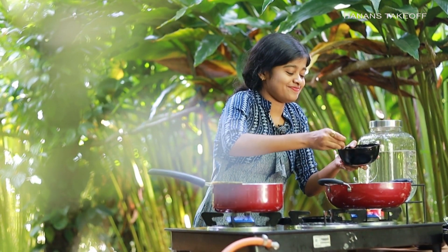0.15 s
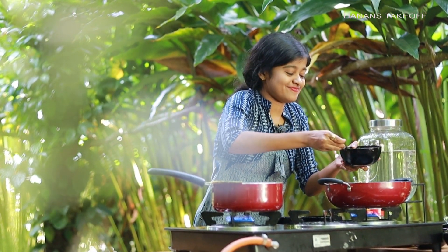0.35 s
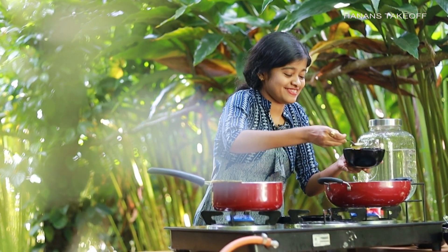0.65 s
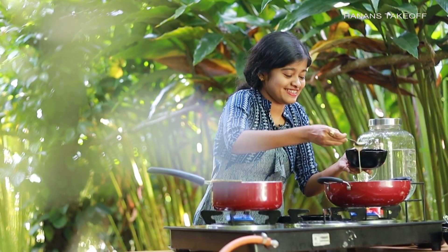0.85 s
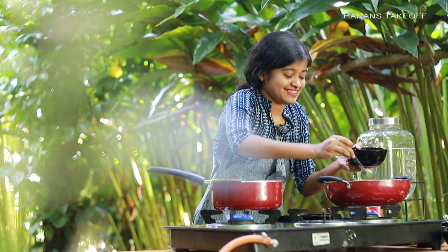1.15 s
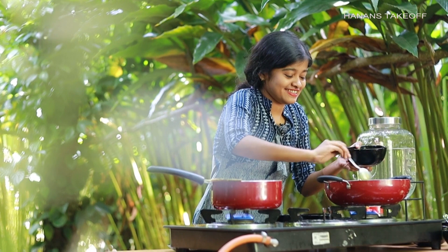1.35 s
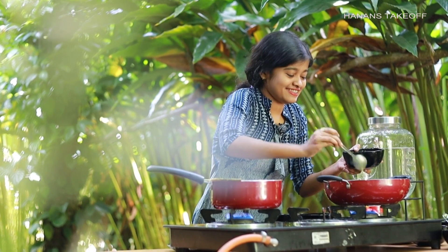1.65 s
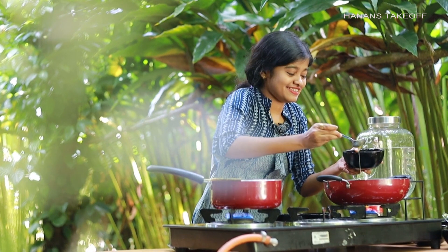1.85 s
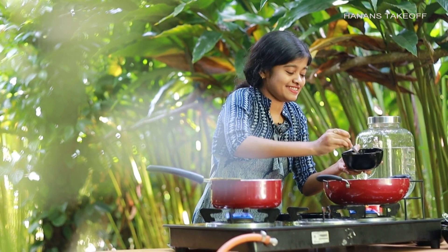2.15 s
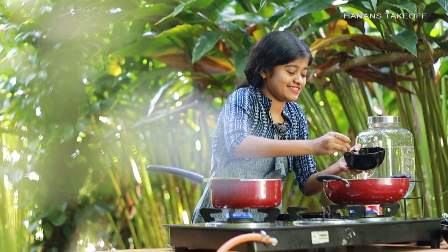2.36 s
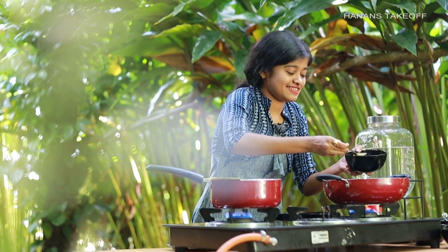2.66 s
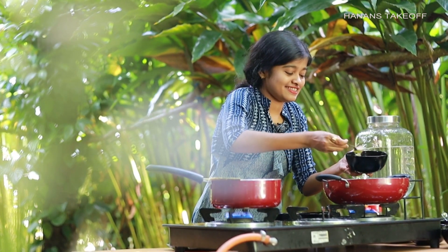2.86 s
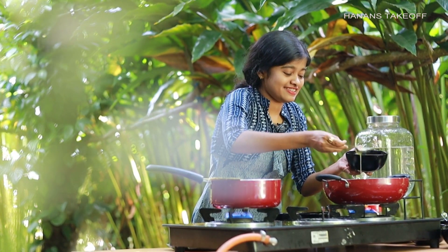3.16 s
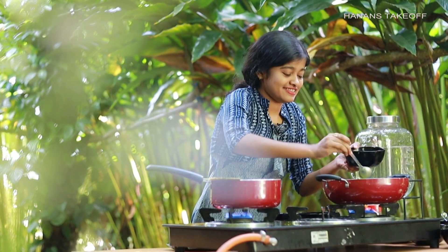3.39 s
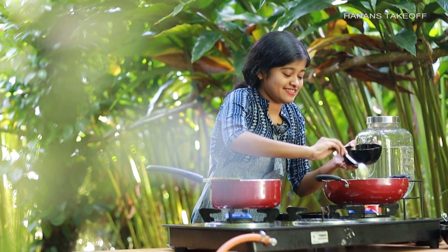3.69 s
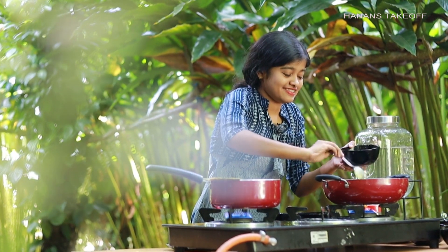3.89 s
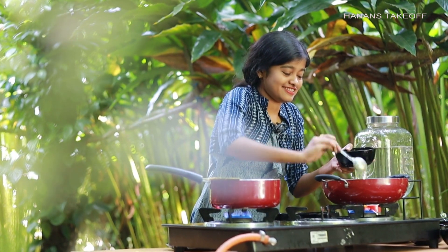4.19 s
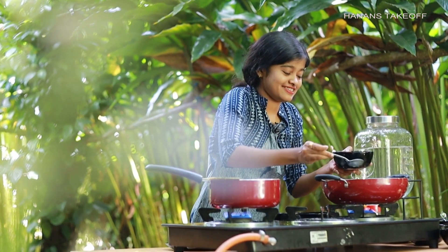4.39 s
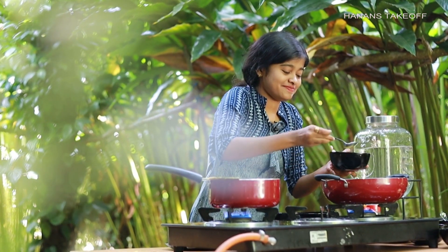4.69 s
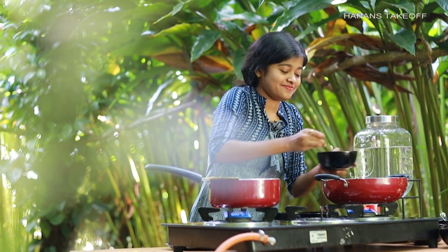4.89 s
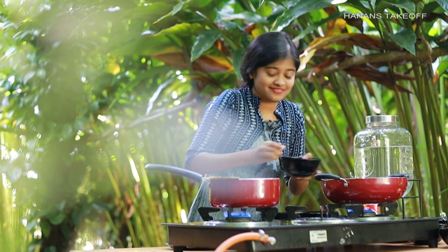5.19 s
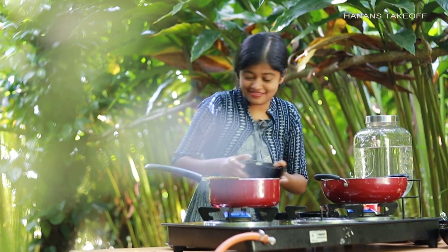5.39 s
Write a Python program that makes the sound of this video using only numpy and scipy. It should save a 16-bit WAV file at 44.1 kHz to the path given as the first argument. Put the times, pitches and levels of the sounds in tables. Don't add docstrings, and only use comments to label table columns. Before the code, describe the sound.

A spoon taps and scrapes a ceramic bowl up close while a distant cuckoo-like bird whistles rising phrases over trilling crickets outdoors.

```python
import sys
import numpy as np
from scipy import signal
from scipy.fft import rfft, irfft, next_fast_len
from scipy.io import wavfile
from scipy.ndimage import uniform_filter1d

SR = 44100
rng = np.random.default_rng(int(sys.argv[2]) if len(sys.argv) > 2 else 0)


def how_loud(loudness_db):
    steps = np.asarray(loudness_db, float) / 20
    return 10 ** steps


def master_out(mix):
    frames = np.transpose(np.atleast_2d(mix))
    ceiling = np.clip(frames, -1, 1)
    pcm = np.round(ceiling * 32767).astype(np.int16)
    wavfile.write(sys.argv[1], SR, pcm)


N = 244269

# (start t/s, note, length/s, held f/Hz, level/dB)
BIRD_NOTES = [
    (0.586, "opening", .226, 1792, -40.5),
    (0.91, "crest", 0.24, 1846, -39.5),
    (1.145, "fall", 0.12, 1851, -39.5),
    (2.626, "opening", 0.24, 1847, -38.5),
    (2.959, "crest", 0.23, 1887, -37.5),
    (3.189, "fall", .122, 1864, -38.5),
    (4.545, "opening", .232, 1893, -34.5),
    (4.875, "crest", .24, 1926, -34),
    (5.115, "fall", 0.11, 1900, -37),
]
NOTE_GLIDES = { "opening": [(0, .78, -30), (.1, .96, -12), (.17, 1, -7), (.42, .99, -7), (.63, 1, 1),
               (.73, .94, -3), (.835, .825, -12), (1, .92, -24)], "crest": [(0, .91, -30), (.085, .98, -13),
               (.2, 1.105, 1.5), (.3, 1.09, -1.5), (.35, 1.005, -1.5), (.635, .995, -2), (.76, .85, -8),
               (.89, .73, -6), (1, .77, -24)], "fall": [(0, 1, -8), (.12, .97, 0), (.38, .885, -2),
               (.64, .815, -2), (1, .87, -20)]}
# (t/s, spot, level/dB, hardness 0-1, freedom to ring 0-1)
SPOON_TAPS = [
    (.2115, "rim", -29, 0.93, 0.66),
    (.2639, "rim", -37.5, 0.76, 0.5),
    (2.3295, "base", -25, 0.8, 0.36),
    (5.1545, "lip", -27, 0.91, 0.62),
    (5.2008, "wall", -19, 0.8, 0.18),
    (5.2125, "wall", -26, 0.76, 0.17),
    (5.217, "wall", -36, 0.5, 0.15),
    (5.2205, "wall", -27.5, 0.85, 0.29),
]
# (t/s, spot, level/dB)
SPOON_SETTLES = [(.348, "wall", -48), (5.2836, "wall", -36.5), (5.289, "skid", -43), (5.303, "lip", -42.5),
                 (5.317, "wall", -42), (5.345, "lip", -49), (5.3726, "wall", -50), (5.394, "rim", -46.5),
                 (5.429, "wall", -47), (5.493, "skid", -48), (5.514, "wall", -46)]
STRIKE_SPOTS = ["rim", "base", "lip", "wall"]
# (f/Hz, t60/s, level/dB struck on rim, on base, on lip, on wall)
BOWL_MODES = [(598, 0.058, -9, -7, -27, -18), (1176, 0.039, -2.5, -3.5, -2, -18),
              (2123, 0.079, -3.5, -4, -7, -16), (2630, 0.04, 6.5, 2.5, 2, 7.5),
              (3110.4, 0.039, -23, -20, -3, 0), (3424, 0.056, -14, -4.5, -4, -2),
              (4150, 0.053, -3, 2, -10, 1), (4390, 0.053, -12, -16, 9, 2.5),
              (4610, .047, -2.5, 10, -9, -11), (6700, 0.044, 2.5, -2, -2, -4),
              (9630, 0.056, -15, -11, -7, -8), (10600, .05, -12, -7.5, 3, -2.5),
              (13400, .056, -25, -25, -7, -7), (15400, .05, -32, -28, -31, -14)]
# (f/Hz, t60/s, level/dB struck on rim, on base, on lip, on wall)
SPOON_MODES = [(885, 0.23, -3.5, -17.5, -6.5, -9.5), (2250, 0.26, -8.5, -13.5, -19, 0),
               (4032, 0.25, -10, -7, -17, 3.5), (6125, 0.23, -16, -25, -30, -2.5),
               (8600, 0.12, -5.5, -0.5, -25, -3.5), (11340, 0.091, -13.5, -2.5, -16, -5),
               (14520, .08, -24, -16, -20, -3)]
# (start t/s, end t/s, level/dB)
CRICKET_BOUTS = [
    (-.05, 0.866, -63.5),
    (0.951, 1.829, -61),
    (1.973, 2.784, -61),
    (2.977, 3.741, -60),
    (3.98, 4.838, -61),
    (4.956, 5.809, -58),
]
# (share of the bout 0-1, wing resonance f/Hz, level/dB)
BOUT_COURSE = [
    (0, 6030, -6),
    (.07, 6090, -2),
    (.16, 6270, 0),
    (.42, 6240, 0),
    (.55, 6370, 0),
    (.8, 6420, 0),
    (.97, 6420, -2),
    (1, 6420, -8),
]
# (t/s, level/dB, centre f/Hz, width/Hz, t60/s)
PAN_DRIPS = [(0.56, -55, 1300, 1400, .02), (.995, -52.5, 880, 25, 0.041), (.70, -62, 2600, 97, 0.075),
             (2.69, -65, 5600, 500, 0.066), (1.769, -40, 1700, 900, 0.014),
             (2.074, -43.5, 1280, 450, 0.019), (4.1, -56, 1170, 1300, 0.018), (3.3, -57, 3300, 2400, 0.016),
             (4.414, -61.5, 3100, 2100, 0.011), (5.050, -50, 10400, 6800, 0.021),
             (1.8, -65, 6300, 440, 0.033), (1.8, -61, 5600, 370, .03), (3.2, -44.5, 990, 820, 0.017)]
# (start t/s, caller, length/s, level/dB)
FAR_CALLS = [(1.38, "finch", .3, -71), (1.7, "finch", .25, -70), (3.65, "finch", .42, -69),
             (1.58, "piper", .12, -70), (1.78, "piper", .12, -71), (.5, "peeper", .1, -65),
             (.68, "peeper", .07, -62), (2.84, "peeper", .07, -63), (1.93, "dove", .28, -66),
             (4.07, "wren", .14, -75), (.01, "thump", .045, -52), (.53, "gust", .08, -59),
             (.77, "gust", .08, -59), (4.9, "gust", .1, -59), (5.24, "rustle", .18, -59),
             (5.4, "rustle", .14, -63)]
CALLER_VOICES = {"katydid": (10000, 800, 30), "finch": (3800, 600, 20), "piper": (2850, 130, 15),
                 "peeper": (2085, 180, 20), "dove": (1130, 80, 10), "gust": (150, 65, 10),
                 "thump": (220, 200, 10), "rustle": (2800, 2100, 35), "wren": (3150, 70, 20)}
# (f/Hz, level/dB per Hz)
AIR_SPECTRUM = [(20, -104), (35, -92.5), (60, -84.5), (120, -83), (250, -88), (500, -88), (850, -89),
                (1250, -96), (2200, -100), (4500, -107), (7500, -113), (10000, -112), (14200, -117),
                (14700, -150)]
# (f/Hz, level/dB per Hz)
CAPSULE_HISS = [(20, -116), (60, -112), (250, -113), (1000, -123), (3000, -118.5), (8000, -119),
                (14200, -120), (14600, -160)]


def bird(overtone_db=-46, flutter_db=3.2):
    out, t = np.zeros(N), np.arange(N) / SR
    for start, note, length, held_hz, note_db in BIRD_NOTES:
        share, ratio, glide_db = np.transpose(NOTE_GLIDES[note])
        s, hz, db = start + length * share, held_hz * ratio, note_db + glide_db
        on = (t >= s[0]) & (t < s[-1])
        pitch = uniform_filter1d(np.interp(t[on], s, hz), size=260, mode="nearest")
        phase = 2 * np.pi * np.cumsum(pitch) / SR
        edge = np.clip(np.minimum(t[on] - s[0], s[-1] - t[on]) / .004, 0, 1)
        gain = np.sqrt(2) * edge * how_loud(np.interp(t[on], s, db) - 1.5)
        out[on] += gain * (np.sin(phase) + how_loud(overtone_db) * np.sin(2 * phase))
    out *= how_loud(flutter_db * walk(60.))
    scattered = signal.sosfilt(signal.butter(2, 1470, "high", fs=SR, output="sos"), out)
    boughs = how_loud(-2) * echo(scattered, t60=.26, rise=.012)
    trunks = how_loud(-4) * echo(scattered, t60=1.15, rise=.02)
    return out + boughs + trunks


def touches():
    hop_s, peak_s = .0029, 5.232
    hops = 5.2262 + hop_s * np.arange(7)
    skid = [(s, "skid", -25 - 0.8 * ((s - peak_s) / hop_s) ** 2, 0.7, 0.21) for s in hops]
    settle = [(s, spot, db, np.clip(.55 + .04 * (db + 40), .1, 1), .25) for s, spot, db in SPOON_SETTLES]
    return SPOON_TAPS + skid + settle


def taps(scatter_db=3.0, dull_db=-8.5, crack_db=-5.0, crack_s=0.0025):
    skid_bowl_db = -3
    bowl_held = .45
    out, t = np.zeros(N + SR), np.arange(SR // 3) / SR
    hz, t60, *spot_db = np.transpose(BOWL_MODES + SPOON_MODES)[:, :, None]
    in_bowl = (np.arange(len(hz)) < len(BOWL_MODES))[:, None]
    hits = touches()
    chance = rng.standard_normal((len(hits), 2, len(hz), 1))
    crack = rng.standard_normal((len(hits), len(t))) * np.exp(-t / crack_s)
    for k, (s, spot, db, hard, free) in enumerate(hits):
        if spot == "skid":
            mode_db = spot_db[-1] + skid_bowl_db * in_bowl
        else:
            mode_db = spot_db[STRIKE_SPOTS.index(spot)]
        softness_db = dull_db * (1.0459 - hard) * np.log2(hz / 1500)
        gain = how_loud(db - 5.0 + mode_db + scatter_db * chance[k, 0] + softness_db)
        decay = how_loud(-60 * t / t60 / np.where(in_bowl, bowl_held, max(free, .05)))
        modes = np.sin(2 * np.pi * hz * (1 + .004 * chance[k, 1]) * t)
        ring = np.sum(gain * decay * modes, axis=0)
        crack_hz = 1500 + 4000 * hard ** 2
        ring += how_loud(db + crack_db) * band(crack[k], crack_hz, crack_hz)
        i = int(s * SR)
        out[i:i + len(t)] += ring * np.minimum(t / 0.0008, 1)
    return out[:N]


def trill(hz, db, stroke_hz, weak=0.65, wobble_hz=59.87, sag_hz=403.0, wet_db=2.0):
    stroke = np.cumsum(stroke_hz * (1 + .07 * walk(16.0))) / SR
    strength = np.where(stroke % 2 < 1, 1, weak)
    gate = np.sin(np.pi * stroke) ** 2 * strength * how_loud(walk(60.))
    pitch = hz + wobble_hz * walk(200.) + sag_hz * (.15 - (stroke % 1) ** 2)
    direct = unit(gate * np.sin(2 * np.pi * np.cumsum(pitch) / SR)) * how_loud(db - 5.0)
    return direct + how_loud(wet_db) * echo(direct, t60=.2, rise=.01)


def crickets(far_hz=6500, far_db=-74.5):
    t, hz, db = np.arange(N) / SR, np.full(N, 6000.), np.full(N, -120.)
    share, course_hz, course_db = np.transpose(BOUT_COURSE)
    for start, end, bout_db in CRICKET_BOUTS:
        on = (t >= start) & (t < end)
        progress = (t[on] - start) / (end - start)
        hz[on] = np.interp(progress, share, course_hz)
        db[on] = np.interp(progress, share, course_db) + bout_db
    near = trill(hz, uniform_filter1d(db, size=400), 103.)
    far = trill(far_hz + 40 * walk(1.8), far_db + 1.2 * walk(3.), 120.)
    return near + far


def drips():
    out, t = np.zeros(N + SR), np.arange(SR // 5) / SR
    noise = rng.standard_normal((len(PAN_DRIPS), len(t)))
    for k, (s, db, hz, width, t60) in enumerate(PAN_DRIPS):
        burst = band(band(noise[k] * how_loud(-60 * t / t60), hz, width), hz, width)
        burst *= how_loud(db + 3.0) / np.max(np.abs(burst))
        i = int(s * SR)
        out[i:i + len(t)] += burst * np.minimum(t / 0.00044, 1)
    return out[:N]


def simmer(count=70, level_db=-62, spread_db=2.0):
    out, t = np.zeros(N + SR), np.arange(SR // 40) / SR
    envelope = np.exp(-t / 0.0031) * np.minimum(t / 0.0014, 1)
    for when, pitch, size in rng.random((count, 3)):
        hz = 1500 * 4.2 ** pitch
        gain = how_loud(level_db - spread_db * np.log(size + 0.013))
        i = int(when * N)
        out[i:i + len(t)] += gain * np.sin(2 * np.pi * hz * t) * envelope
    return out[:N]


def chatter():
    out, t = np.zeros(N), np.arange(N) / SR
    noise = rng.standard_normal(N)
    every_s = .72
    katydids = [(s, "katydid", .25, -78) for s in np.arange(.23, N / SR - every_s, every_s)]
    for s, caller, length, db in FAR_CALLS + katydids:
        hz, width, throb_hz = CALLER_VOICES[caller]
        on = (t >= s) & (t < s + length)
        rasp = unit(band(band(noise[on], hz, width), hz, width))
        swell = np.sin(np.pi * (t[on] - s) / length)
        throb = 1 + 0.084 * np.sin(2 * np.pi * throb_hz * t[on])
        out[on] += how_loud(db) * rasp * swell * throb
    return out


def coloured(spectrum, swell_db, flicker_db):
    size = next_fast_len(N)
    octave = np.log2(np.fft.rfftfreq(size, 1 / SR) + 1e-9)
    hz, db = np.transpose(spectrum)
    density = how_loud(np.interp(octave, np.log2(hz), db)) * np.sqrt(SR / 2)
    spec = rfft(rng.standard_normal(size)) * density
    swell = swell_db * walk(1.76)
    out = np.zeros(N)
    for centre in range(4, 16):
        window = np.cos(np.pi / 2 * np.clip(octave - centre, -1, 1)) ** 2
        out += irfft(spec * window, size)[:N] * how_loud(swell + flicker_db * walk(8.1))
    return out


def echo(x, t60, rise):
    t = np.arange(int(1.5 * SR)) / SR
    tail = rng.standard_normal(len(t)) * (1 - np.exp(-(t / rise) ** 2)) * how_loud(-60 * t / t60)
    return signal.fftconvolve(x, tail / np.sqrt(np.sum(tail ** 2)))[:N]


def walk(rate):
    k = int(SR / rate)
    held = np.repeat(rng.standard_normal(N // k + 1), k)
    return 1.6 * uniform_filter1d(uniform_filter1d(held, k), k)[:N]


def band(x, hz, width):
    edges = [max(hz - width / 2, 1), hz + width / 2]
    return signal.sosfilt(signal.butter(1, edges, "band", fs=SR, output="sos"), x)


def unit(x):
    return x / np.sqrt(np.mean(x ** 2))


def scene():
    near = taps() + drips() + simmer()
    near = signal.sosfilt(signal.butter(14, 15100, fs=SR, output="sos"), near)
    yard = how_loud(-12) * echo(near, t60=0.092, rise=0.0013)
    far = bird() + crickets() + chatter() + coloured(AIR_SPECTRUM, 0.58, 0.39)
    mid = far + near + yard
    bright_edge = how_loud(-25) * band(echo(near, t60=0.018, rise=0.0008), 15000, 9000)
    side = coloured(CAPSULE_HISS, 0.16, .3) + bright_edge
    return np.array([mid + side, mid - side])


def band_limit(x):
    return signal.sosfilt(signal.butter(12, 16650, fs=SR, output="sos"), x)


def record(dry):
    return band_limit(dry)


dry = scene()
out = record(dry)
master_out(out)
```